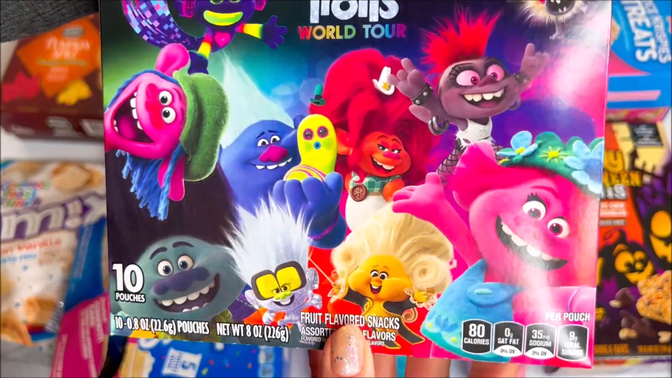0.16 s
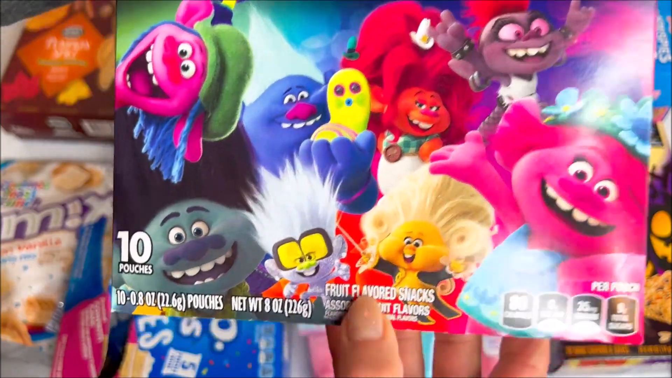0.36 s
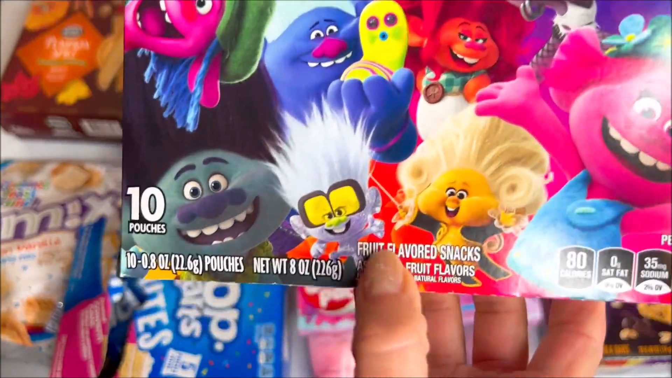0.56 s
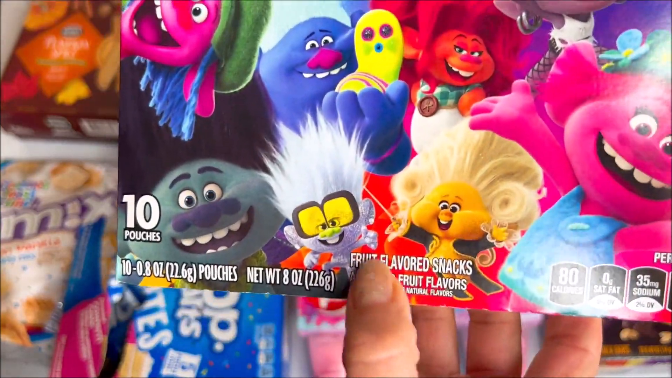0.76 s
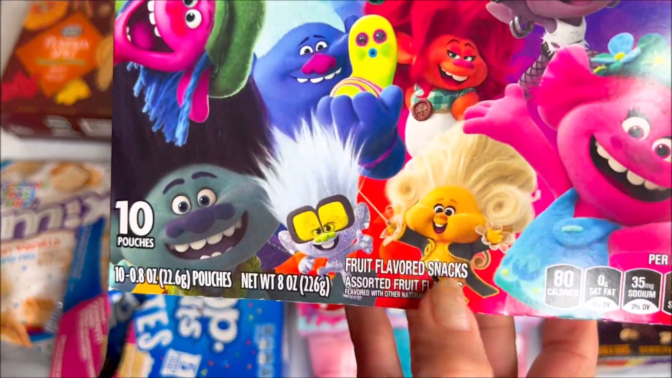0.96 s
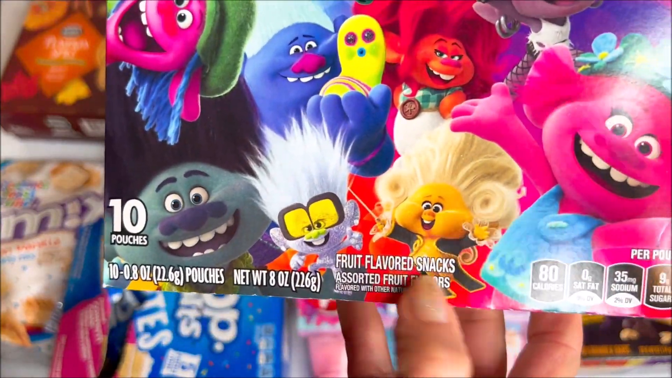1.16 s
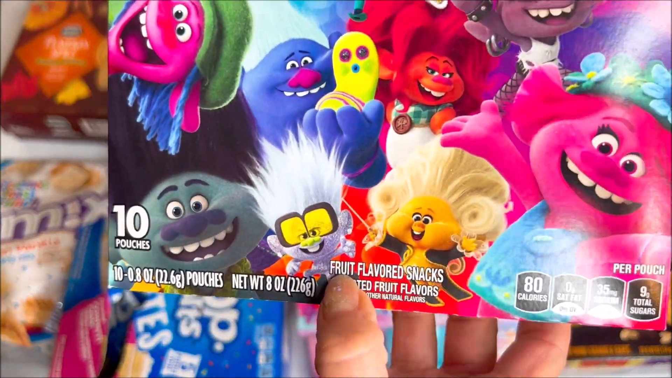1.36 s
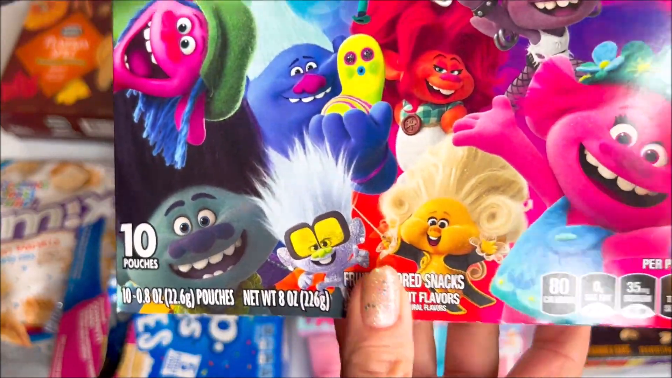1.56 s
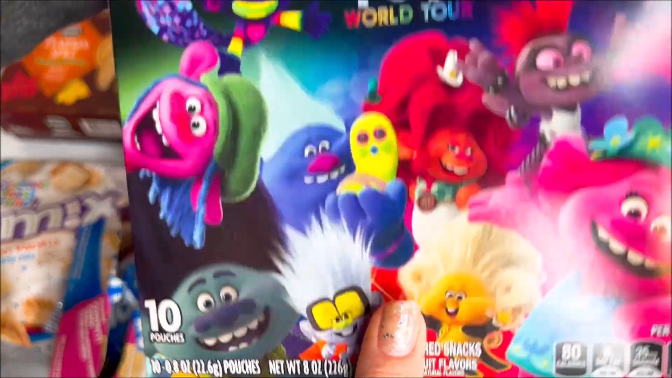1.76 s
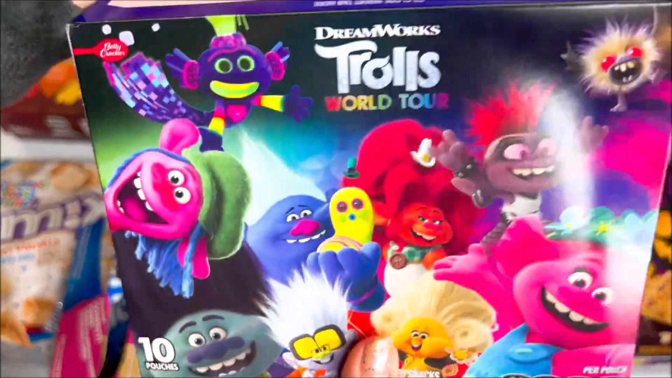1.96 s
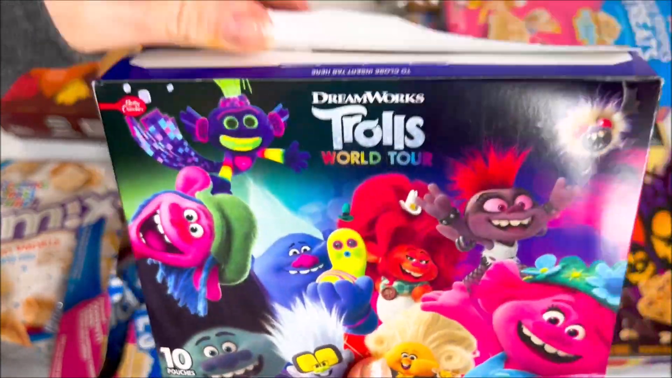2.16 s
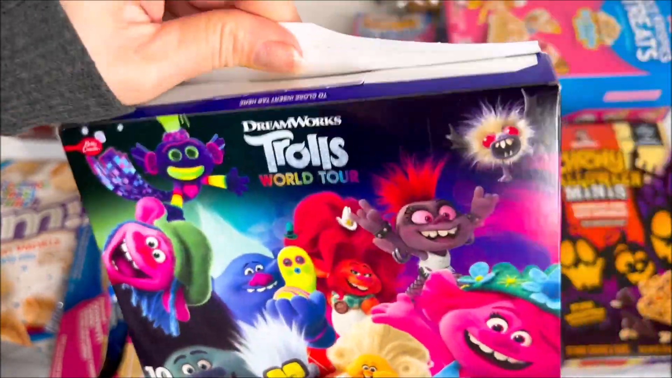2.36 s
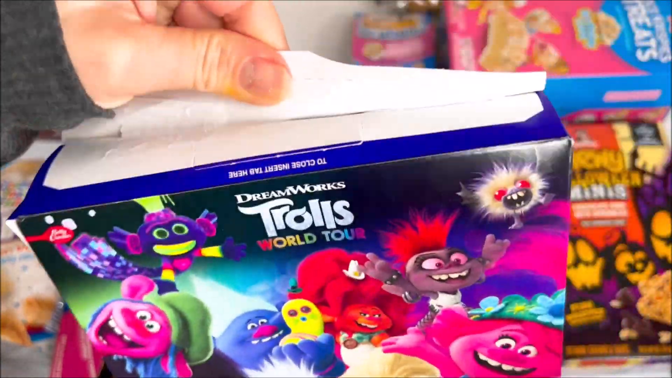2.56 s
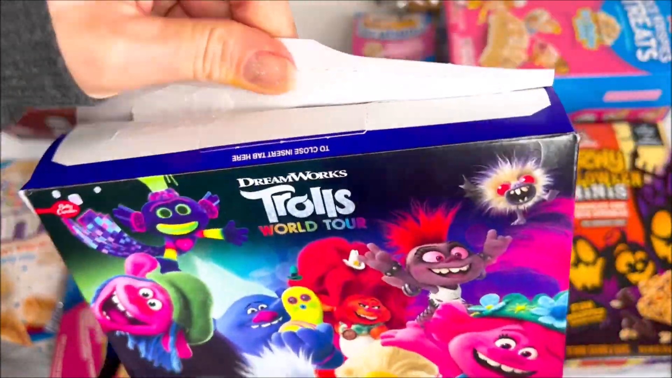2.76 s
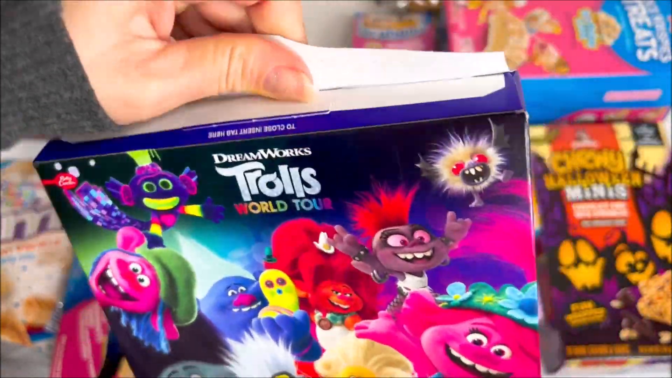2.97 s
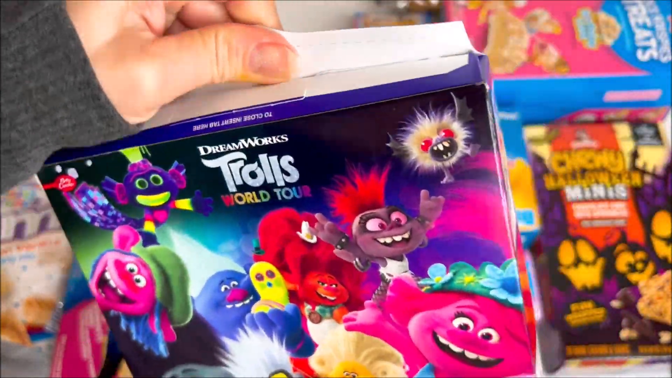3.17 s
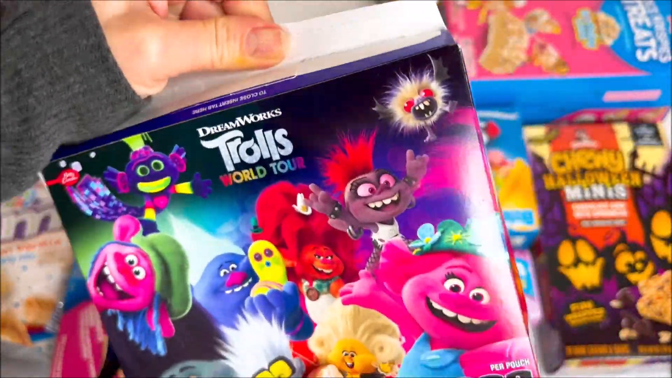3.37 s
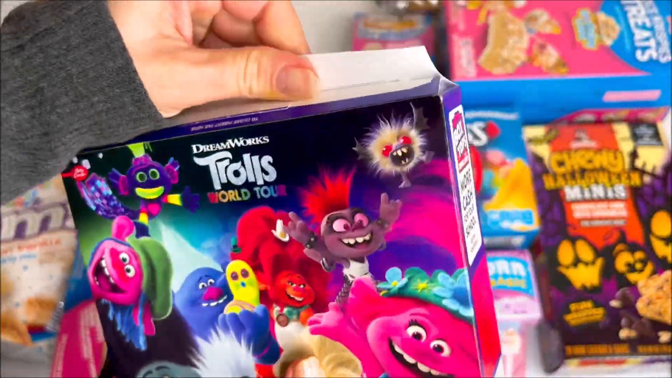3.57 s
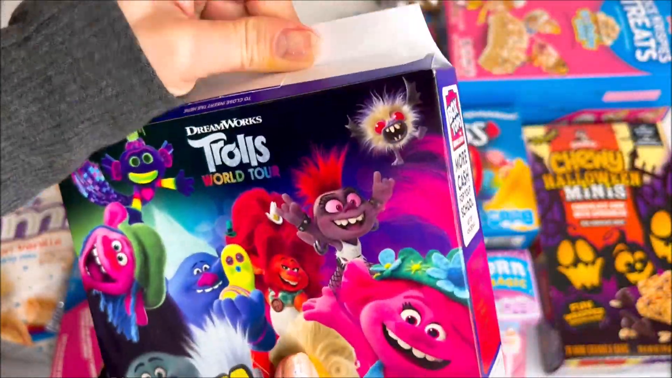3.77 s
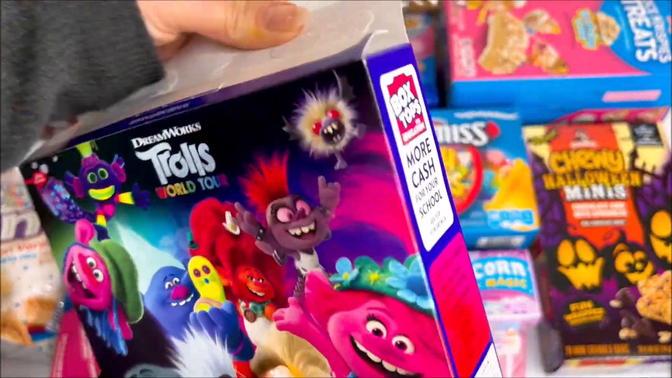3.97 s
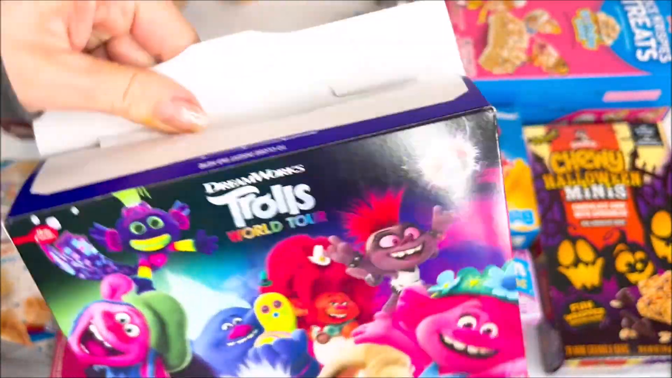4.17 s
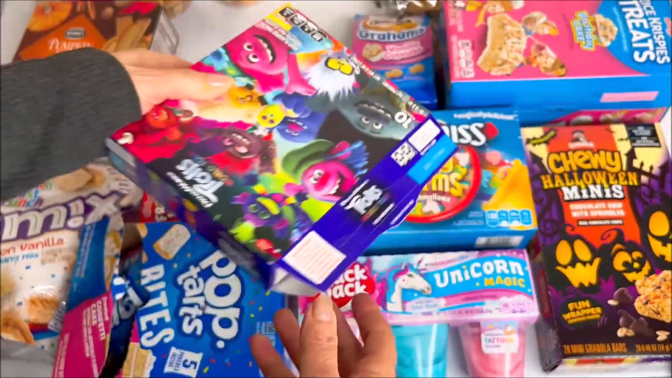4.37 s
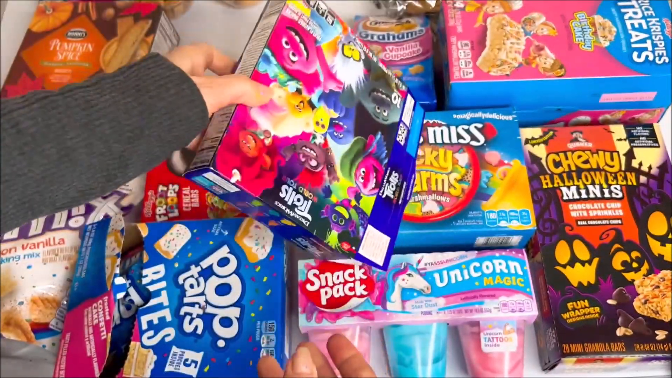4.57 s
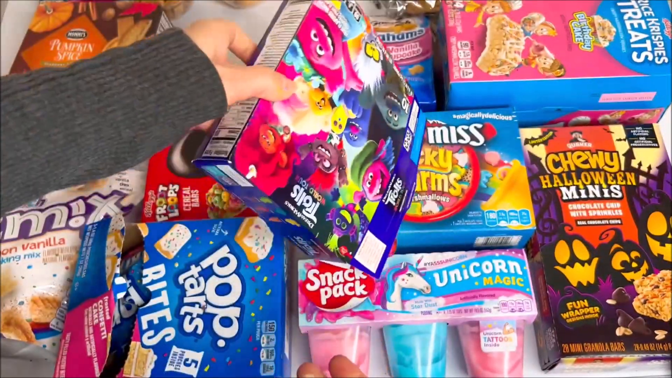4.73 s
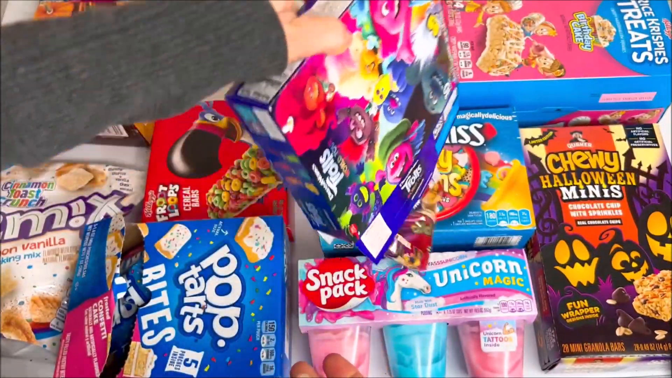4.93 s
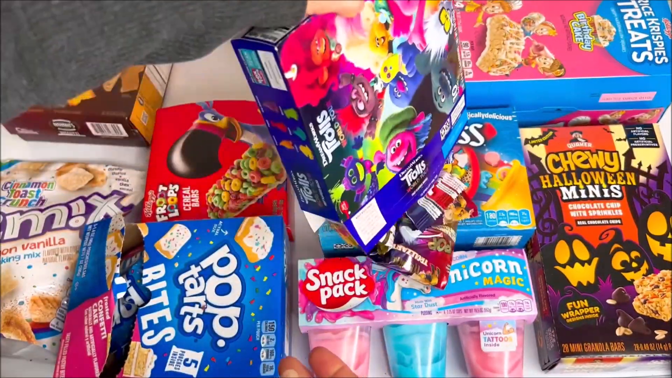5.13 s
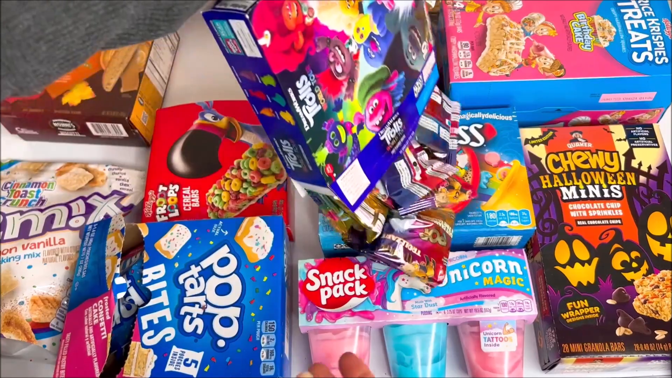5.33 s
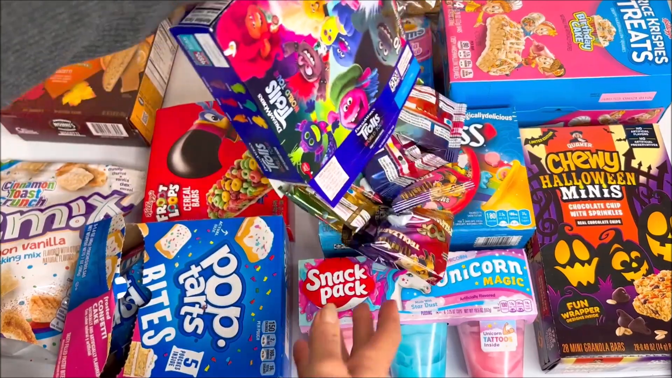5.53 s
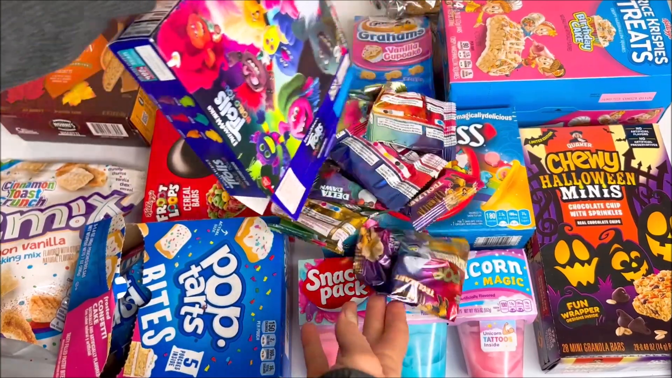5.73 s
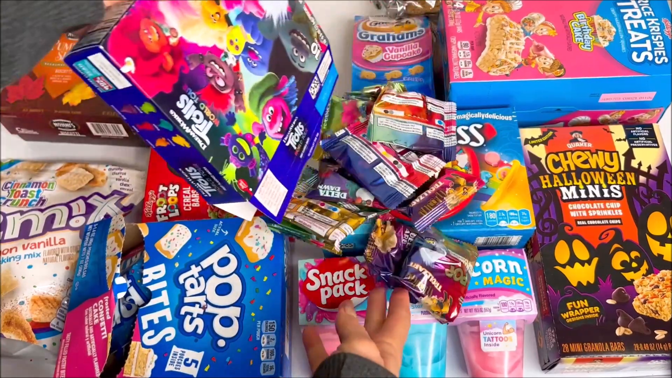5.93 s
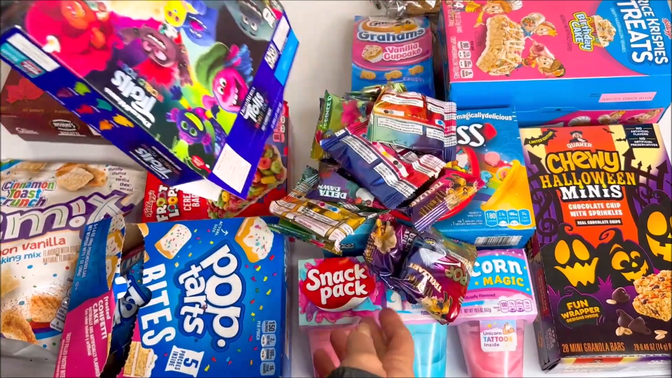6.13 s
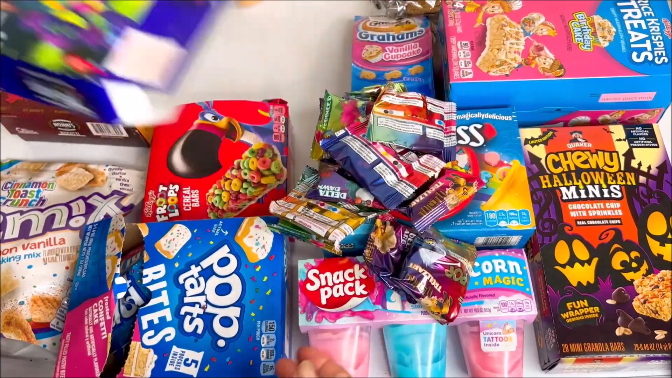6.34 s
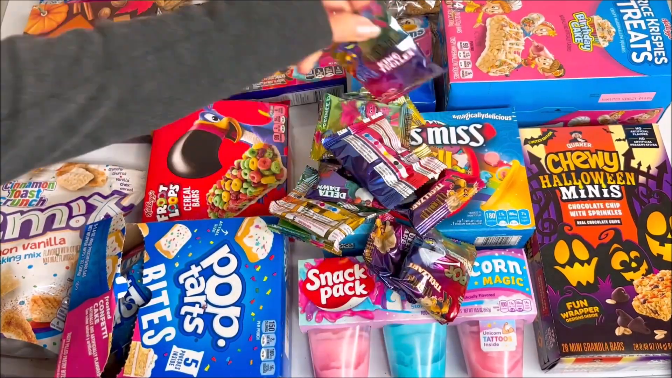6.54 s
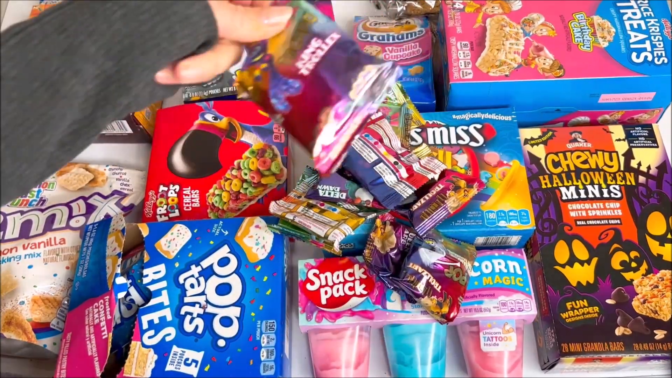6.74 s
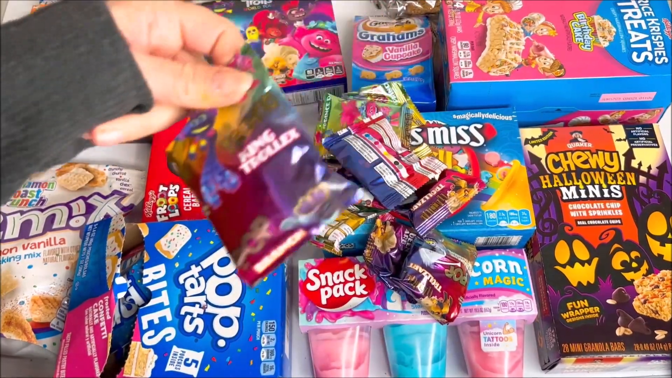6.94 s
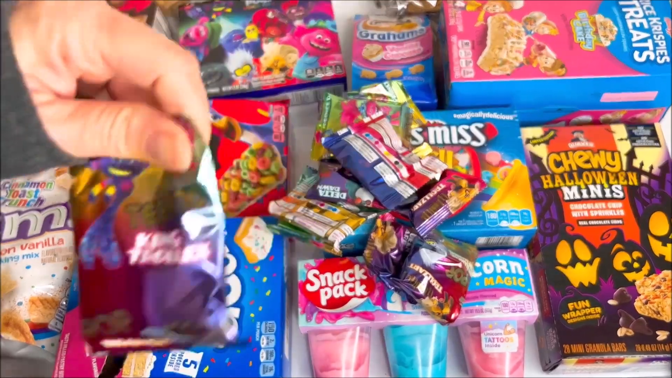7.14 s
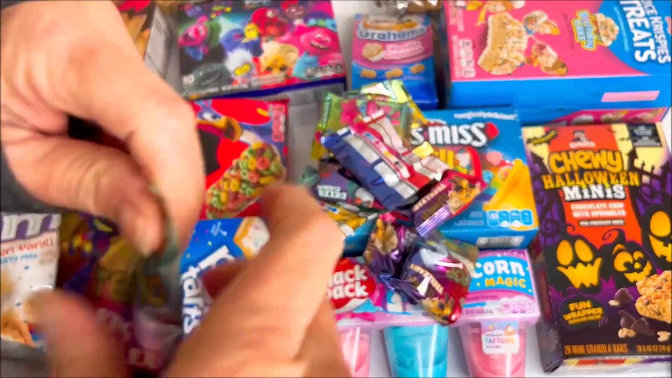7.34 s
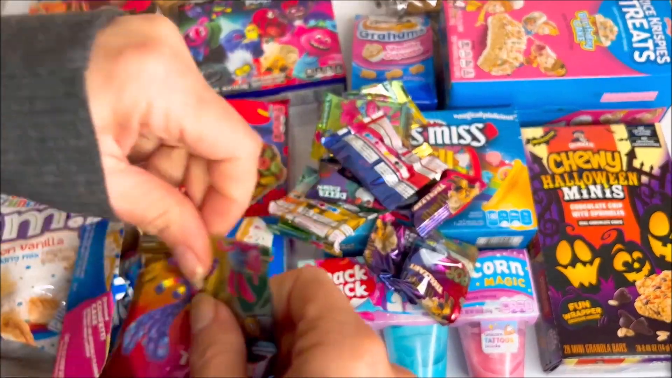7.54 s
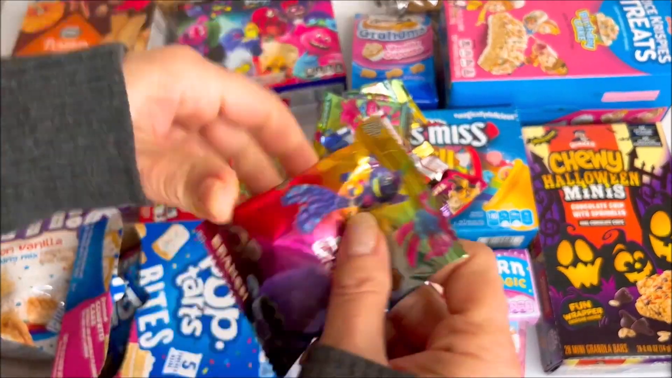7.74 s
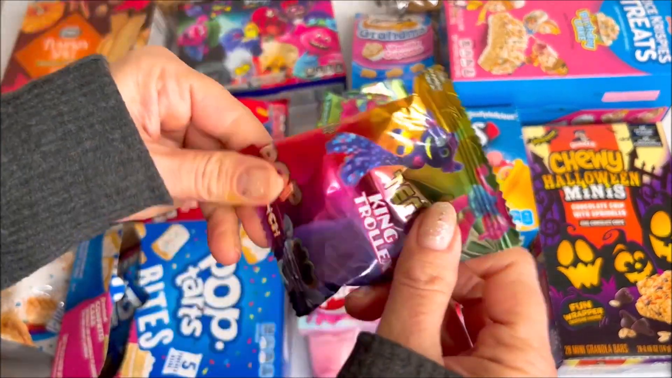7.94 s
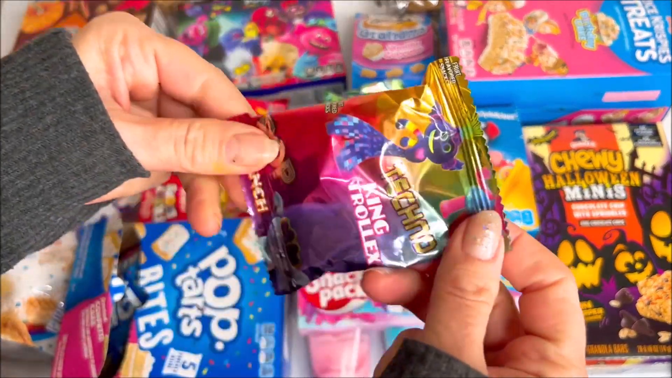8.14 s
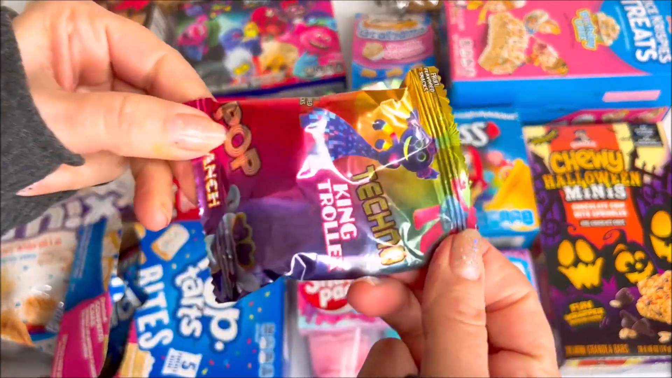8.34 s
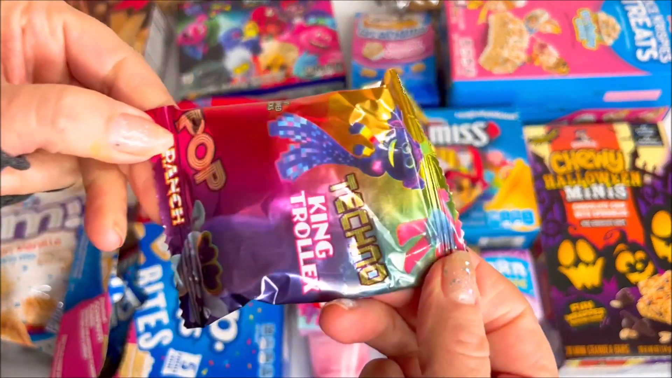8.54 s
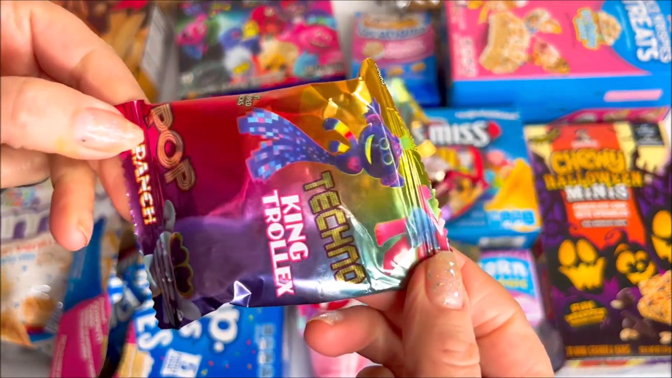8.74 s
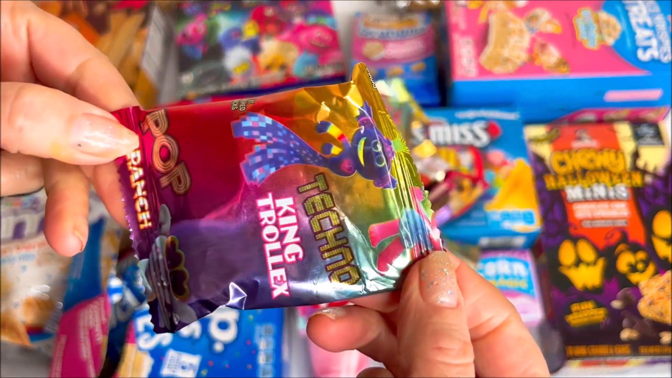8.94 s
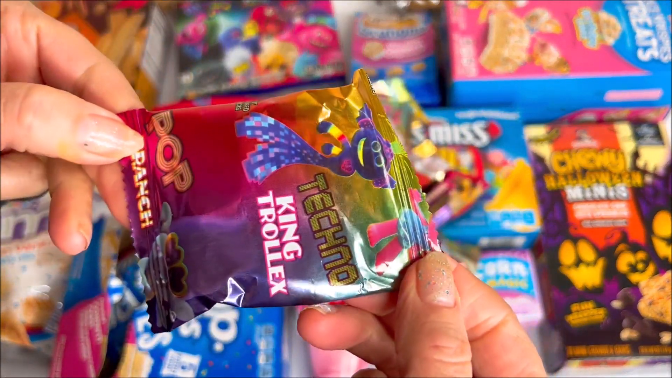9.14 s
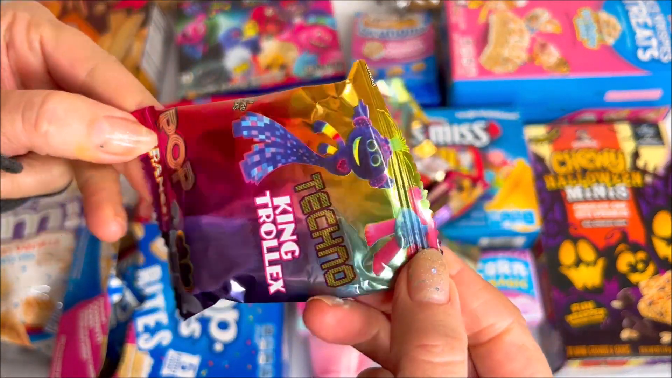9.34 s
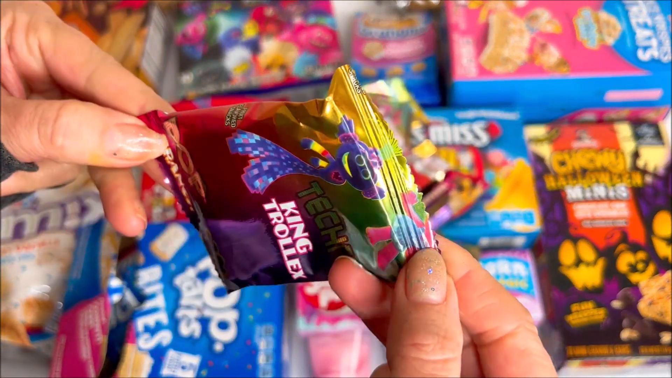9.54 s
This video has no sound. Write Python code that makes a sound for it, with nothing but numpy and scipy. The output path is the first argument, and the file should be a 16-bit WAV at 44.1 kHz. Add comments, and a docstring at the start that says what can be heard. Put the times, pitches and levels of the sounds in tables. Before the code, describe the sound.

Soft card rubbing and knocks, a creaking flap with sharp cracks, pouches tumbling out, then dense crisp foil crackle that thins to sparse ticks.

```python
"""Quiet room with a hum and a low house drone; two microphone ports close to a cardboard box.
Hands turn the box, pull its glued flap open, shake foil pouches out onto a table and finger one of them.
Card rub is shaped noise, creak a train of slips through wall resonances, knocks are struck damped modes.
Foil creases are short ringing bursts, single and in showers over a film hiss; grip is low rumble.
The near sounds also feed a short decaying room tail."""
import sys
import numpy as np
from scipy import signal
from scipy.fft import rfft, irfft, next_fast_len
from scipy.io import wavfile
from scipy.ndimage import uniform_filter1d, map_coordinates

SR = 44100
rng = np.random.default_rng(int(sys.argv[2]) if len(sys.argv) > 2 else 0)


def file_out(sig):
    """Save sig as 16-bit WAV at sys.argv[1]."""
    # one column per channel
    cols = np.atleast_2d(sig).T
    # limit, then scale
    lim = np.clip(cols, -1, 1)
    pcm = np.round(lim * 32767).astype(np.int16)
    wavfile.write(sys.argv[1], SR, pcm)


def voltage_ratio(decibels):
    """Convert decibels (scalar or array-like) to amplitude ratios, 20 dB per decade."""
    exponent = np.asarray(decibels, float) / 20
    return 10 ** exponent


N = 427769

# room hum spectrum, relative: f/Hz, level/dB per Hz
HUM_SPECTRUM = [(15, -32), (25, -2), (65, 0), (148, -4), (245, -10), (314, -8), (719, -23), (1770, -26),
                (3320, -33), (8000, -39), (10000, -44), (13000, -75), (22000, -120)]
# left-right likeness of the hum: f/Hz, likeness
HUM_ALIKE = [(60, 0.63), (240, 1), (950, 0.17), (3770, 0.27), (15000, 0.09)]
# low drone in the house, relative: f/Hz, level/dB per Hz
DRONE_SPECTRUM = [(35, -37), (45, -0.5), (52, 18), (62, -10), (80, -39)]
# left-right likeness of handling noise and drone: f/Hz, likeness
HANDLING_ALIKE = [(100, 0.96), (600, 0.77), (2000, 0.47), (7000, 0.69), (10000, 1)]
# separate hand movements: loudest t/s, card rub/dB, foil rustle/dB, rise/s, fall/s (rub over 20 dB)
MOVES = [(0.0, -58, -58, .05, 0.048), (0.138, -54.5, -69, 0.099, 0.1), (.369, -63, -78, 0.22, 0.12),
         (.589, -60, -72, 0.088, 0.083), (1.6, -54, -50.5, 0.2, 0.12), (1.676, -43, -65.5, 0.053, 0.45),
         (1.76, -35, -41.5, 0.082, 0.24), (1.82, -34.5, -33, 0.18, 0.046), (1.915, -38, -54, 0.038, 0.067),
         (1.968, -45.5, -24.5, 0.067, 0.073), (2.105, -39, -55, 0.015, 0.1),
         (2.287, -46.5, -45.5, 0.17, 0.17), (2.479, -40, -68, 0.067, 0.1),
         (2.602, -50.5, -33.5, 0.56, 0.16), (2.674, -37, -42.5, 0.067, 0.16),
         (2.878, -49, -43.5, 0.13, 0.15), (3.06, -34, -43.5, 0.15, 0.15), (3.268, -46.5, -45.5, 0.28, 0.25),
         (3.458, -43.5, -51.5, .4, 0.21), (3.658, -40, -40, 0.25, 0.99), (3.84, -18.5, -19, 0.022, 0.07),
         (3.94, -31, -42.5, .1, 0.085), (4.125, -45.5, -41.5, 0.38, 0.23),
         (4.216, -42.5, -39.5, 0.055, 0.03), (4.322, -44.5, -52, .2, 0.4), (4.592, -29, -28, 0.11, 0.12),
         (4.96, -37, -32, 0.25, 0.26), (5.285, -37.5, -41, 0.078, 0.1), (5.363, -45.5, -34.5, 0.35, 0.294),
         (5.468, -41.5, -40.5, .3, 0.092), (5.722, -37.5, -30.5, 0.16, 0.14),
         (5.797, -30, -36, 0.043, 0.062), (6.39, -67, -68.5, 0.051, .25), (6.57, -59, -54, 0.13, 0.71),
         (7.074, -53, -46.5, 0.15, 0.32), (7.378, -48.5, -35.5, .03, 0.17), (7.46, -50, -28.5, 0.082, 0.15),
         (7.661, -60, -42.5, .4, 0.42), (8.047, -54, -40.5, 0.64, 0.45), (8.474, -47.5, -38.5, 0.077, 0.1),
         (8.801, -69, -71, .4, 0.19), (9.01, -77, -79.5, 0.064, .3), (9.379, -65.5, -51, 0.072, 0.2),
         (9.62, -63, -58.5, 0.35, 0.35)]
# steady slides of hand or pouch over card: start t/s, end t/s, card rub/dB, foil rustle/dB
SLIDES = [(0.798, 1.041, -58.5, -69.5), (1.163, 1.3, -54, -64), (1.435, 1.447, -48.5, -52.5),
          (5.883, 6.012, -64.5, -61.5)]
# rubbed card spectrum, relative: f/Hz, level/dB per Hz
CARD_SPECTRUM = [(71, -38), (120, -16.5), (256, -2), (369, -0.5), (435, -2), (608, -7), (1030, -4),
                 (2240, -13), (4500, -23), (5850, -37.5), (9900, -120)]
# grip on the packet: t/s, rumble/dB while the card rubs at RUB_DB
GRASP = [(0, -56), (1.3, -56.5), (1.5, -50), (1.75, -63), (1.93, -45.5), (2.1, -60.5), (2.5, -47.5),
         (2.8, -62.5), (3.9, -56.5), (4.21, -46), (4.4, -73.5), (5.8, -58.5), (6.1, -71), (6.6, -57),
         (7.4, -71), (8.1, -61), (8.6, -60), (9.0, -57.5), (9.7, -63.5)]
# grip rumble spectrum, relative: f/Hz, level/dB per Hz
GRIP_SPECTRUM = [(15, -55.5), (25, 2.5), (96, -2.5), (146, -10), (216, -5), (250, -4.5), (320, -30.5),
                 (550, -120)]
# foil spectrum, relative: f/Hz, level/dB per Hz
FOIL_SPECTRUM = [(500, -2.5), (1200, -4.5), (2500, 1), (5000, -2), (8500, -0.5), (11000, -0.5),
                 (13000, -1.5), (15500, -6)]
# single creases in the rustle: t/s, power share 0-1
CREASE_SHARE = [(0, 0.8), (2.3, 0.21), (2.9, 0.17), (4.6, 0.53), (6.3, 0.68), (6.9, 0.5)]
# glue giving way, card and pouches flipping: t/s, crack peak/dB, ring f/Hz, body/dB re crack peak
RIPS = [(.1015, -47, 1980, 5), (.2884, -57, 1900, -20), (.55, -70, 2500, -21), (.8002, -55, 1520, 19.5),
        (1.1633, -62, 1550, 17), (1.4258, -44, 2060, 0), (1.5958, -31.5, 2220, -10),
        (1.8328, -2.5, 8600, -14), (1.9108, -32.5, 1200, 11), (1.9696, -7.5, 7820, -15.5),
        (2.0918, -22.5, 2620, -31), (2.4053, -26, 4700, -32), (2.4262, -32, 1610, 0),
        (2.6806, -13.5, 7500, 3.5), (2.7486, -35.5, 2840, 5), (2.8714, -14.5, 1870, -4.5),
        (2.9632, -32.5, 4540, -17), (3.2234, -48, 1940, -6), (3.363, -39, 3010, 8),
        (3.3887, -31, 1710, -15), (3.462, -23.5, 1690, -0.5), (3.8271, -6.5, 1475, -13),
        (3.9338, -20, 1730, 5), (4.0507, -30, 6330, -10), (4.1649, -26.5, 1627, 2),
        (4.2644, -22.5, 1690, -21.5), (4.3051, -25, 1710, -7), (4.471, -32, 2220, -4.5),
        (4.5237, -22, 5210, -1), (4.587, -20, 2270, -25), (4.7444, -27.5, 1980, -26),
        (4.805, -19, 7900, -28), (4.8426, -26, 1560, -22), (4.8938, -23, 1490, -7), (5.094, -33, 1800, -61),
        (5.2338, -28, 1770, -20), (5.2694, -15.5, 1710, -12), (5.3384, -20, 2140, -24),
        (5.457, -24, 1720, -25), (5.5256, -26, 1820, -23), (5.6411, -21, 4060, -17),
        (5.7286, -13.5, 2480, -38), (5.7814, -16.5, 1850, -8)]
# blows on box and table: t/s, thud peak/dB, pitch f/Hz, rattle drive/dB re thud, hollow drive/dB re wall
KNOCKS = [(0.176, -28.5, 276, -11, -1.5), (0.348, -46, 244, 12.5, -13), (1.05, -32.5, 294, -4, 4),
          (1.475, -28, 292, -1, 5), (1.665, -35, 248, -2, -17.5), (1.909, -9, 277, 2, 0.5),
          (1.968, -18, 296, 15.5, -7.5), (2.102, -31.5, 230, 14, -14.5), (2.216, -44.5, 290, 22, -12.5),
          (2.294, -36, 220, 17.5, -0.5), (2.49, -33, 250, 10, 2.5), (2.605, -29.5, 302, 10, -8.5),
          (2.677, -19, 281, 5, -28.5), (2.869, -35.5, 314, 29, -8.5), (3.36, -34, 238, 10, -10),
          (3.455, -21, 299, -6.5, -2.5), (3.724, -33.5, 400, 19.5, -10.5), (3.775, -30.5, 466, 20, -12.5),
          (3.836, -16, 260, 23, -11), (3.851, -16.5, 483, 21.5, -4), (4.125, -35.5, 216, 18.5, 3),
          (4.209, -13.5, 270, 10, -2), (4.263, -30, 250, 15.5, -0.5), (4.303, -31.5, 247.7, 19, -6.5),
          (4.526, -40.5, 314, 29.5, -8.5), (4.582, -23.5, 416, 19.5, -14.5), (4.937, -38.5, 371, 19.5, -13),
          (5.012, -23, 447, 4, -15), (5.271, -45.5, 417, 32.5, -11.5), (5.663, -33.5, 343, 10, -12),
          (5.783, -27, 317, 19.5, -10), (6.371, -48.5, 327, 11, -14)]
# closed box walls: f/Hz, width/Hz, level/dB
BOX_MODES = [(256, 130, -0.5), (625, 56, 2), (770, 17, -7), (1043, 30, 1.5), (1456, 17, -15.5),
             (2214, 9, -6), (2390, 13, -18), (2840, 46, -21)]
# box with its flap lifted: f/Hz, width/Hz, level/dB
FLAP_MODES = [(287, 43, -5), (474, 33, 6), (1160, 54, 5), (1270, 13, 6.5), (1950, 20, -3), (2750, 93, -7),
              (3450, 65, -8.5), (3820, 130, -15.5), (4740, 360, -15)]
# card sticking and slipping: start t/s, end t/s, slip rate/(1/s) at start, middle, end
CREAKS = [(1.65, 1.83, 245, 202, 255), (2.375, 2.52, 90, 68, 66), (3.0, 3.12, 345, 343, 340),
          (3.6, 3.72, 530, 515, 485)]
# clearest foil creases snapping: t/s, crack peak/dB, ring f/Hz, body/dB re crack peak
SNAPS = [(6.5511, -16, 2170, -25.5), (6.566, -20, 4490, -30), (6.6293, -32.5, 1210, -8),
         (6.6912, -53, 8330, -32), (6.7074, -35.5, 8400, -31), (6.729, -38, 1500, -7),
         (6.787, -40, 1600, 3.5), (6.798, -34.5, 1690, -9), (6.8627, -35, 1580, -13),
         (6.9436, -27, 5190, -22), (6.958, -26, 7640, -40), (7.0068, -20, 7390, -45),
         (7.0294, -37, 4970, -25), (7.0347, -21.5, 5610, -36), (7.0495, -16, 7230, -19),
         (7.0576, -17, 6650, -33), (7.0626, -19, 7930, -24), (7.0888, -10, 4300, -30.5),
         (7.0994, -15.5, 3480, -27), (7.1578, -14, 6640, -24), (7.1666, -16, 8660, -29),
         (7.1766, -4.5, 6740, -32), (7.2259, -24.5, 6320, -30), (7.3452, -25.5, 4250, -8.5),
         (7.3567, -18, 2160, -40), (7.3682, -14.5, 4300, -47), (7.3766, -23, 8420, -23),
         (7.3834, -8, 8390, -34), (7.399, -32.5, 7840, -23.5), (7.4107, -13, 6060, -19.5),
         (7.4191, -13.5, 2540, -24.5), (7.4229, -14, 4370, -15), (7.4327, -17, 4170, -24),
         (7.4395, -13, 3910, -19), (7.4455, -13, 6500, -31), (7.464, -15, 3050, -25),
         (7.4784, -15, 1740, -33.5), (7.4848, -10, 3660, -39), (7.4894, -10.5, 6520, -24),
         (7.4983, -10, 1470, -31), (7.5093, -7.5, 2070, -39), (7.537, -18, 4240, -22),
         (7.5407, -7.5, 3450, -21), (7.5817, -8.5, 4220, -57), (7.6233, -14, 4820, -35),
         (7.65, -21, 4290, -35.5), (7.664, -8.5, 7910, -32.5), (7.683, -30, 6420, -15),
         (7.6894, -23, 2530, -14), (7.7112, -24, 6860, -38), (7.7417, -16, 7850, -20.5),
         (7.8214, -18.5, 4880, -13.5), (7.8564, -29, 7610, -15.5), (7.871, -23, 8730, -28),
         (7.8856, -18.5, 5060, -21), (7.894, -10, 3970, -9.5), (7.9098, -16, 4830, -19),
         (7.9658, -19, 2770, -8), (7.977, -17, 8050, -25), (7.9905, -21, 4290, -38),
         (8.013, -11, 9000, -22), (8.0269, -14, 1460, -13.5), (8.0524, -17, 4290, -13),
         (8.0617, -10.5, 8320, -18), (8.0754, -30, 1860, -15), (8.101, -16.5, 1230, -4.5),
         (8.1405, -17, 5930, -33.5), (8.1476, -19.5, 8020, -19), (8.1628, -27, 2140, -20),
         (8.1715, -22, 2110, -15), (8.2003, -27.5, 2680, -9), (8.2519, -24.5, 4380, -0.5),
         (8.2899, -21.5, 1197, -14.5), (8.3097, -11.5, 8500, -17.5), (8.336, -23, 7510, -34.5),
         (8.3559, -17.5, 5800, -21), (8.3972, -25, 7190, -31.5), (8.414, -27.5, 1480, -6),
         (8.4442, -36, 1210, -12.5), (8.4536, -11.5, 7930, -15.5), (8.4668, -10, 4060, -19),
         (8.4737, -7.5, 1180, -9), (8.617, -40.5, 7660, -40), (8.6502, -46.5, 2480, -18.5),
         (8.685, -46, 1467, -1), (8.743, -26, 2730, -8), (8.8752, -50, 1240, -9),
         (8.9909, -25.5, 3810, -24), (9.3465, -32.5, 2710, -14), (9.3605, -19, 7760, -42),
         (9.419, -24.5, 3540, -12), (9.4489, -24.5, 2800, -11), (9.4705, -24, 4420, -32),
         (9.5414, -27, 4090, -41), (9.5647, -17.5, 8240, -28), (9.6106, -26, 3570, -15),
         (9.62, -19.5, 8400, -23), (9.6285, -13, 5260, -43), (9.647, -20.5, 8400, -36)]
# room decay: f/Hz, t60/s
ROOM_T60 = [(150, 0.12), (1000, 0.089), (5000, 0.18), (15000, 0.0085)]
# microphone band edges: f/Hz, level/dB
MIC_BAND = [(22, -14), (45, 0), (15700, 0), (16000, -9), (16550, -20), (16750, -55)]
# port level difference: f/Hz, left-right level/dB
PORT_TILT = [(60, 2.5), (180, 4.5), (550, 4.5), (1650, 3.5), (4970, 4.5), (15000, -2)]
# phase by which the left port leads: f/Hz, phase/rad
PORT_LEAD = [(0, 0), (3100, .8), (8200, .4), (10200, -np.pi), (13700, -3 * np.pi), (15400, -4 * np.pi)]

HUM_DB, DRONE_DB = -72.5, -75
SLIDE_RISE_S, SLIDE_FALL_S = 0.022, 0.072  # rub, over 20 dB
FOIL_SWING = 1.4  # dB of rustle swell per dB of rub swell
RUB_FLUTTER_DB, RUB_PATCHY_DB = 2.0, 3.0
TAPS_DB, TAP_CYCLES = -2, 4  # re rub, before random spread; cycles per 30 dB of decay
RUB_DB, GRASP_FOLLOWS = -47, .3  # reference rub; dB of rumble per dB of rub
RIP_T60_S, SNAP_T60_S = 0.0037, .003  # main burst; snaps spread about theirs
PRESS_ROUGH, PRESS_CYCLES = .5, 0.92  # force unevenness; press length in wall swings
HOLLOW_HZ, HOLLOW_WIDTH_HZ, HOLLOW_LAG_S = 129, 130, .006  # box air, answering late
CREAK_SHARE, CREAK_FADE_S = .8, .015  # rub power turned to creak, before the creak gain
OPEN_S = 2.9  # flap free: creak rings FLAP_MODES from here on
ROOM_DB = -14


def unit(x):
    """Scales to rms 1."""
    return x / np.sqrt(np.mean(x ** 2) + 1e-20)


def along(points, hz):
    """Reads (f/Hz, value) points on a log frequency axis."""
    f, v = np.transpose(points)
    return np.interp(np.log(hz + 1), np.log(f + 1), v)


def curves(rows):
    """One value per sample for each column after the time."""
    s, *cols = np.transpose(rows)
    return [np.interp(np.arange(N) / SR, s, c) for c in cols]


def wobble(rate_hz):
    """Smooth random curve, rate_hz knots a second."""
    knots = rng.standard_normal(int(N * rate_hz / SR) + 4)
    return map_coordinates(knots, [np.arange(N) * rate_hz / SR])


def filtered(x, response):
    """Applies a complex frequency response."""
    m = next_fast_len(N + 8192)
    return irfft(rfft(x, m) * response(np.fft.rfftfreq(m, 1 / SR)), m)[..., :N]


def mode(f, hz, width_hz):
    """One damped resonance, gain 1 at its peak."""
    return 1j * f * width_hz / (hz * hz - f * f + 1j * f * width_hz + 1e-9)


def walls(f, modes=BOX_MODES):
    """Wall resonances summed with alternating sign."""
    return sum((-1) ** k * voltage_ratio(db) * mode(f, hz, w) for k, (hz, w, db) in enumerate(modes))


def rush(spectrum, alike, flutter_db=0, patchy_db=0):
    """Stereo noise of rms 1: level flutters quickly, colour shifts in patches."""
    noise = rng.standard_normal((2, N)) * voltage_ratio(flutter_db * (wobble(35) + wobble(160)))
    if patchy_db:
        z = signal.stft(noise, nperseg=512)[2]
        field = uniform_filter1d(rng.standard_normal(z.shape[1:]), size=4, axis=0)
        field = uniform_filter1d(field, size=16, axis=1)
        noise = signal.istft(z * voltage_ratio(patchy_db * unit(field)), nperseg=512)[1][:, :N]

    def mid_side(hz):
        turn = np.arccos(np.clip(along(alike, hz), -1, 1)) / 2
        return voltage_ratio(along(spectrum, hz)) * [np.cos(turn), np.sin(turn)]

    mid, side = filtered(noise, mid_side)
    return unit(np.array([mid + side, mid - side]))


def placed(s, shapes, pan_db):
    """Sums short sounds, one a row, at their times; pan_db is left over right."""
    at = (np.round(s * SR).astype(int)[:, None] + np.arange(shapes.shape[1])).ravel()
    ports = [shapes * voltage_ratio(side * pan_db / 2)[:, None] for side in (1, -1)]
    return np.array([np.bincount(at, x.ravel(), N + SR)[:N] for x in ports])


def flips(s, db, ring_hz, body_db, t60_s, size=1024):
    """A sheet flips: burst and weaker settling ring the sheet and push the air under it."""
    t, f = np.arange(size) / SR, np.fft.rfftfreq(size, 1 / SR)
    noise = rng.standard_normal((len(s), size + 1))
    life = np.clip(t60_s, .001, .1)[:, None]
    fade = voltage_ratio(-60 * t / life) + 0.35 * voltage_ratio(-60 * t / (7 * life))
    onset = 1 - np.exp(-t / (0.046 * life))
    burst = noise[:, 1:] * fade * onset * (1 - t / t[-1])
    peak = lambda x: x / np.abs(x).max(1, keepdims=True)
    ring = .55 + mode(f, ring_hz[:, None], .35 * ring_hz[:, None])
    sheet = voltage_ratio(along(FOIL_SPECTRUM, f)) * ring * mode(f, 5900, 36000)
    lag = np.exp(-2j * np.pi * f * .0003)
    crack = peak(irfft(rfft(burst) * sheet * lag))
    body = peak(irfft(rfft(burst) * mode(f, 630, 1600) ** 2))
    return placed(s, voltage_ratio(db)[:, None] * (crack + voltage_ratio(body_db)[:, None] * body), 3.3 * noise[:, 0])


def hum():
    """Room hum: steady shaped noise."""
    return voltage_ratio(HUM_DB) * rush(HUM_SPECTRUM, HUM_ALIKE)


def drone():
    """House drone: low narrow noise, level wandering slowly."""
    return voltage_ratio(DRONE_DB + 2.5 * wobble(2.5)) * rush(DRONE_SPECTRUM, HANDLING_ALIKE)


def moves():
    """Rub, rustle and slide-free rub in dB: moves swell and die, slides hold; powers add."""
    t = np.arange(0, N + 256, 256) / SR
    rows = [(s, s, *rest) for s, *rest in MOVES]
    rows += [(*row, SLIDE_RISE_S, SLIDE_FALL_S) for row in SLIDES]
    start, end, card_db, foil_db, rise, fall = (c[:, None] for c in np.transpose(rows))
    down_db = 20 * np.maximum(np.maximum((start - t) / rise, (t - end) / fall), 0)

    def total(db):
        power = (voltage_ratio(db) ** 2).sum(0) + 1e-14
        return np.interp(np.arange(N) / SR, t, 10 * np.log10(power))

    rub_db = card_db - down_db
    return total(rub_db), total(foil_db - FOIL_SWING * down_db), total(rub_db[:len(MOVES)])


def card_rub(card_db, creak_share):
    """Fingers rub card: patchy noise, slightly coloured by the walls, yielding to creak."""
    noise = rush(CARD_SPECTRUM, HANDLING_ALIKE, flutter_db=RUB_FLUTTER_DB, patchy_db=RUB_PATCHY_DB)
    rub = filtered(noise, lambda f: 1.8 + 0.07 * walls(f))
    return voltage_ratio(card_db) * np.sqrt(1 - creak_share) * unit(rub)


def taps(card_db):
    """Small contacts of card and pouches, each ringing a few cycles at its own pitch."""
    draw, t = rng.random((1200, 4)), np.arange(450) / SR
    s, hz = draw[:, 0] * (N / SR - .02), 280 * 9 ** draw[:, 1:2]
    size_db = np.minimum(-5 * np.log(draw[:, 2]), 12)
    db = card_db[(s * SR).astype(int)] + TAPS_DB + size_db
    ring = np.sin(2 * np.pi * hz * t) * voltage_ratio(-30 * hz * t / TAP_CYCLES) * (1 - t / t[-1])
    return placed(s, voltage_ratio(db)[:, None] * ring, 8 * (draw[:, 3] - .5))


def grip(card_db):
    """Grip on the packet: fluttering low rumble that partly follows the rub."""
    grip_db = curves(GRASP)[0] + GRASP_FOLLOWS * (card_db - RUB_DB)
    return voltage_ratio(grip_db) * rush(GRIP_SPECTRUM, HANDLING_ALIKE, flutter_db=3.5)


def crinkle(rustle_db):
    """Small creases fire under the fingers, louder in clumps, over the hiss of sliding film."""
    share = np.clip(curves(CREASE_SHARE)[0], 0, 1)
    draw = rng.random((5000, 4))
    s = draw[:, 0] * (N / SR - .02)
    at = (s * SR).astype(int)
    size_db = np.minimum(-4 * np.log(draw[:, 1]) + 3 * wobble(25)[at], 14)
    ring_hz, t60_s = 1500 * 6 ** draw[:, 2], 0.0034 + .004 * draw[:, 3]
    shower = flips(s, rustle_db[at] + size_db, ring_hz, np.full(len(s), -11), t60_s, size=256)
    hiss = voltage_ratio(rustle_db) * rush(FOIL_SPECTRUM, HANDLING_ALIKE, flutter_db=3.0, patchy_db=4.0)
    return np.sqrt(share) * shower + np.sqrt(1 - share) * hiss


def rips():
    """Glue lets go, card and pouches flip: single bursts of one decay time."""
    return flips(*np.transpose(RIPS), t60_s=np.full(len(RIPS), RIP_T60_S), size=2048)


def knocks():
    """Soft uneven blows swing the struck wall and the hollow, and rattle the other walls."""
    s, db, hz, rattle_db, hollow_db = (c[:, None] for c in np.transpose(KNOCKS))
    t = np.arange(4096) / SR
    f, u = np.fft.rfftfreq(len(t), 1 / SR), t * hz / PRESS_CYCLES
    noise = rng.standard_normal((len(s), 2, len(t)))
    uneven = uniform_filter1d(noise[:, 0], size=48, axis=1) * np.sqrt(48)
    force = u * np.exp(1 - 2.3 * u) * (1 + PRESS_ROUGH * uneven)
    hollow = mode(f, HOLLOW_HZ, HOLLOW_WIDTH_HZ) * np.exp(-2j * np.pi * f * HOLLOW_LAG_S)
    struck = mode(f, hz, 1.1 * hz) + voltage_ratio(hollow_db) * hollow
    thud = irfft(rfft(force) * struck * mode(f, 250, 730))
    thud = voltage_ratio(db) * thud / np.abs(thud).max(1, keepdims=True)
    drive = noise[:, 1] * voltage_ratio(db + rattle_db) * u * np.exp(1 - 1.24 * u)
    centre = np.zeros(len(s))
    rattle = filtered(placed(s[:, 0], drive, centre), lambda f: walls(f) + .5 * mode(f, 700, 420))
    return placed(s[:, 0], thud, centre) + rattle


def creak_course():
    """Slip rate gliding through each creak, and creak share fading in and out."""
    rows = []
    for a, b, r0, r1, r2 in CREAKS:
        rows += [(a, r0), ((a + b) / 2, r1), (b, r2)]
    t = np.arange(N) / SR
    on = sum(np.clip(np.minimum(t - a, b - t) / CREAK_FADE_S + .5, 0, 1) for a, b, *_ in CREAKS)
    return curves(rows)[0], CREAK_SHARE * on


def creak(card_db, slip_hz, creak_share):
    """Strained card scrapes and slips in uneven jerks that ring the box walls."""
    count = np.floor(np.cumsum(slip_hz * (1 + .04 * wobble(90))) / SR)
    jerks = np.diff(count, prepend=0) * voltage_ratio(1.5 * rng.standard_normal(N)) * np.sqrt(SR / slip_hz)
    scrape = jerks + .85 * rng.standard_normal(N)
    shut = unit(filtered(scrape, lambda f: walls(f, BOX_MODES)))
    lifted = unit(filtered(scrape, lambda f: walls(f, FLAP_MODES)))
    ringing = np.where(np.arange(N) < OPEN_S * SR, shut, lifted)
    return voltage_ratio(card_db) * 1.22 * np.sqrt(creak_share) * ringing


def foil_snaps():
    """Clear foil creases snap, each with its own decay time."""
    t60_s = SNAP_T60_S * voltage_ratio(2.5 * rng.standard_normal(len(SNAPS)))
    return flips(*np.transpose(SNAPS), t60_s=t60_s)


def room(x):
    """Noise tails, each frequency dying at its own speed; a new tail every third of a second."""
    out, step = np.zeros((2, N + SR)), SR // 3
    for start in range(0, N, step):
        hz, t, z = signal.stft(rng.standard_normal((2, SR // 4)), SR, nperseg=256)
        decay = voltage_ratio(-60 * t / along(ROOM_T60, hz)[:, None])
        tail = signal.istft(z * decay, SR, nperseg=256)[1]
        tail = tail / np.linalg.norm(tail[0])
        answer = signal.fftconvolve(x[None, start:start + step], tail, axes=1)
        out[:, start + 90:][:, :answer.shape[1]] += answer  # 90 samples late
    return out[:, :N]


def scene():
    """Hands, box and foil close by, plus room tail, hum and drone."""
    card_db, rustle_db, jostle_db = moves()
    slip_hz, creak_share = creak_course()
    near = card_rub(card_db, creak_share) + (1 - creak_share) * taps(jostle_db)
    near = near + grip(card_db) + crinkle(rustle_db)
    near = near + rips() + knocks() + creak(card_db, slip_hz, creak_share) + foil_snaps()
    return near + voltage_ratio(ROOM_DB) * room(near.mean(0)) + hum() + drone()


def top_cut(x):
    """Nothing passes above the cut-off."""
    return signal.sosfilt(signal.butter(12, 17130, fs=SR, output="sos"), x)


def record(dry):
    """Two ports differing in level and phase, within the microphone band."""
    def ports(f):
        phase = np.interp(f, *np.transpose(PORT_LEAD))
        half = voltage_ratio(along(PORT_TILT, f) / 2) * np.exp(.5j * phase)
        return voltage_ratio(along(MIC_BAND, f)) * np.array([half, 1 / half])

    return top_cut(filtered(dry, ports))


dry = scene()
out = record(dry)
file_out(out)
```